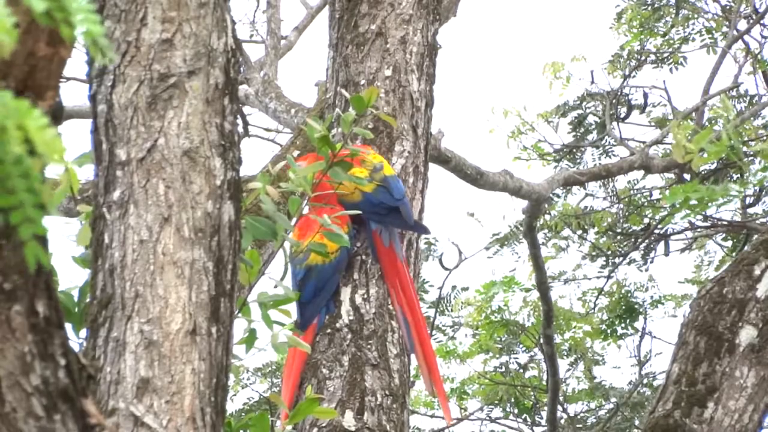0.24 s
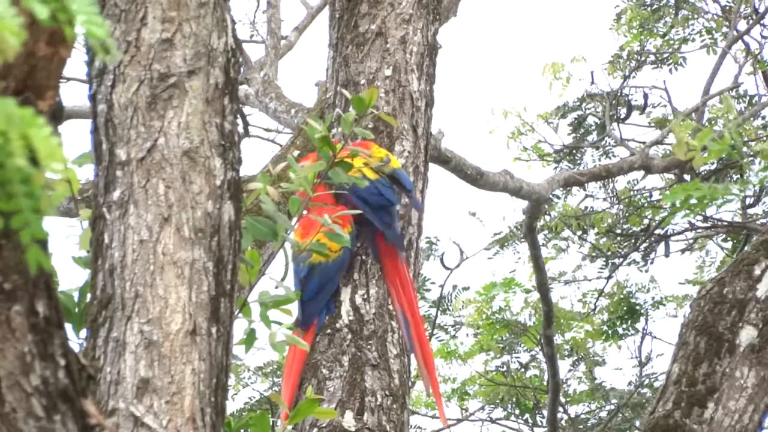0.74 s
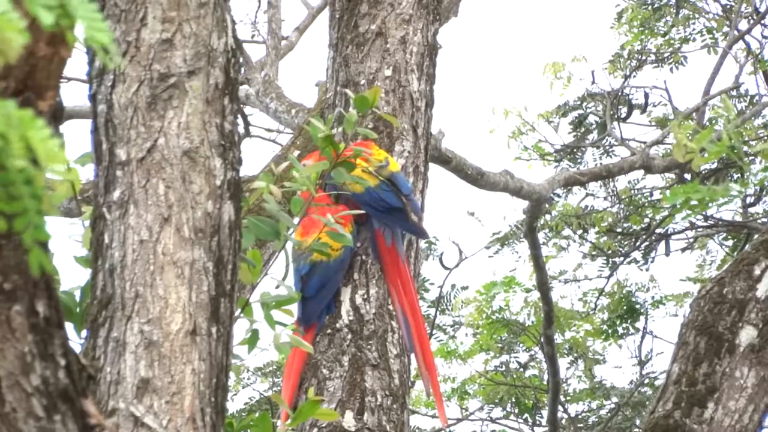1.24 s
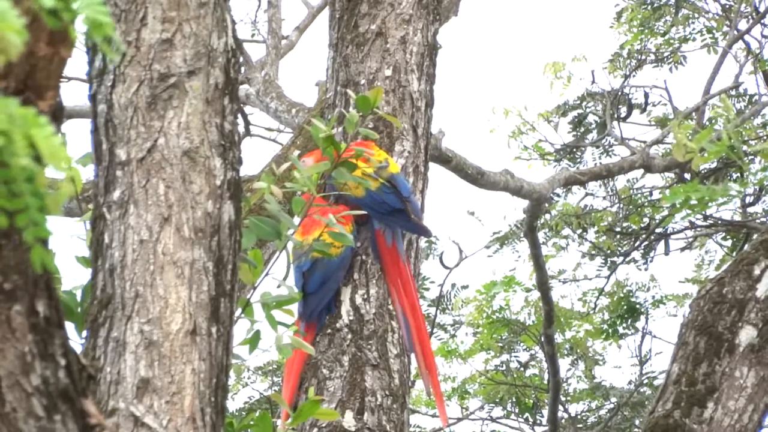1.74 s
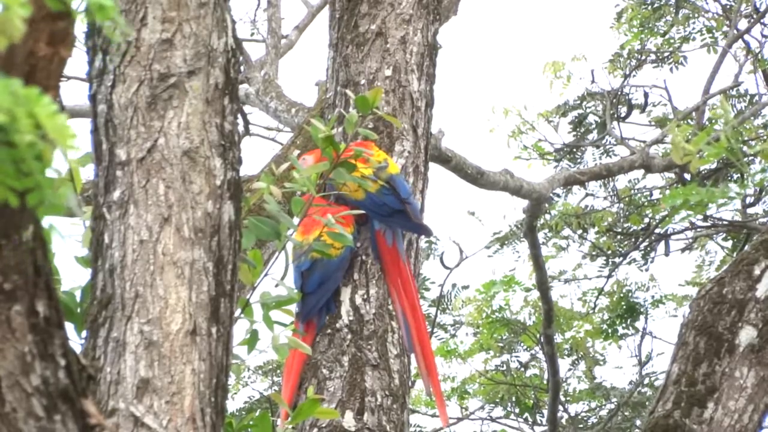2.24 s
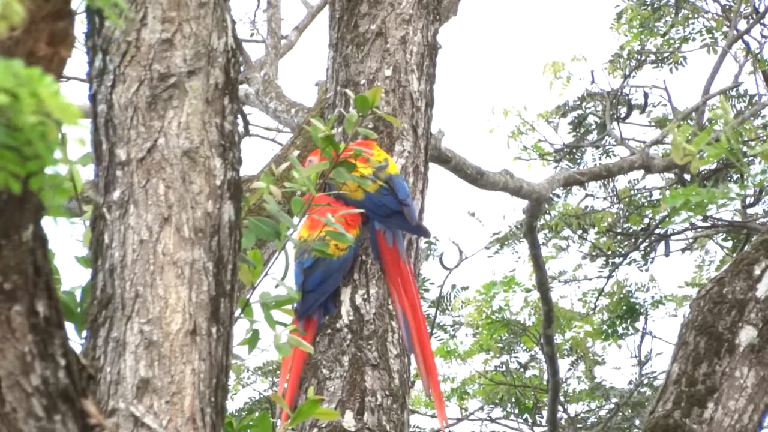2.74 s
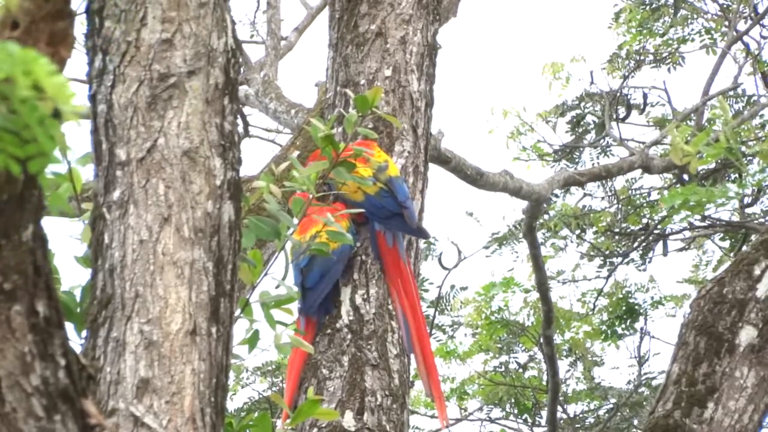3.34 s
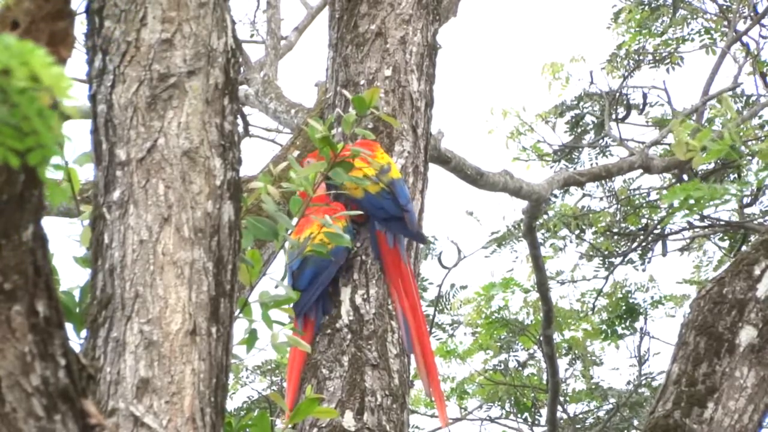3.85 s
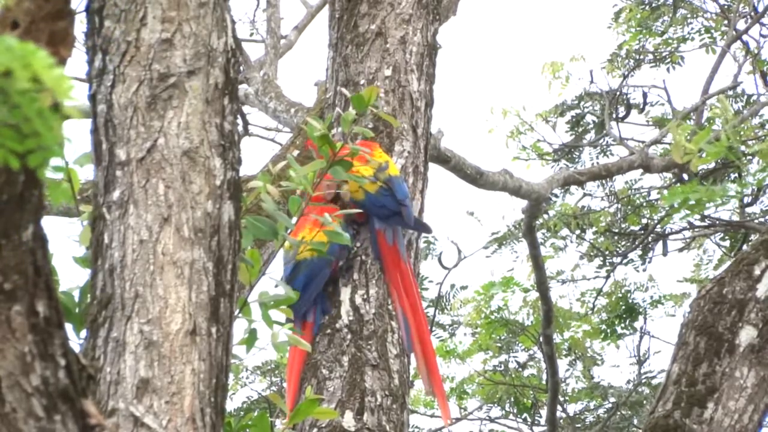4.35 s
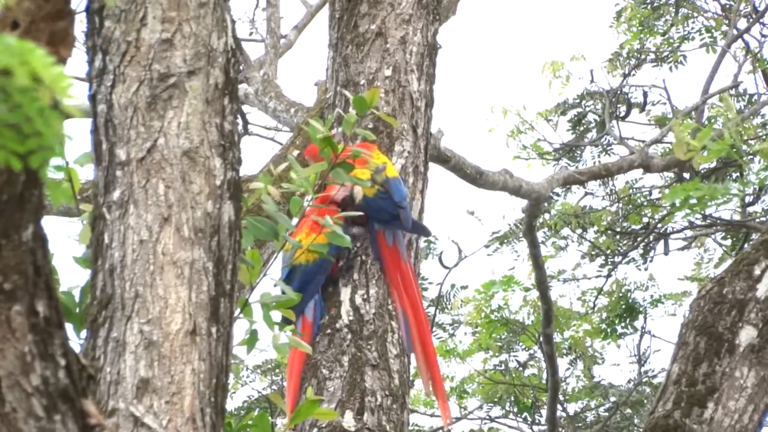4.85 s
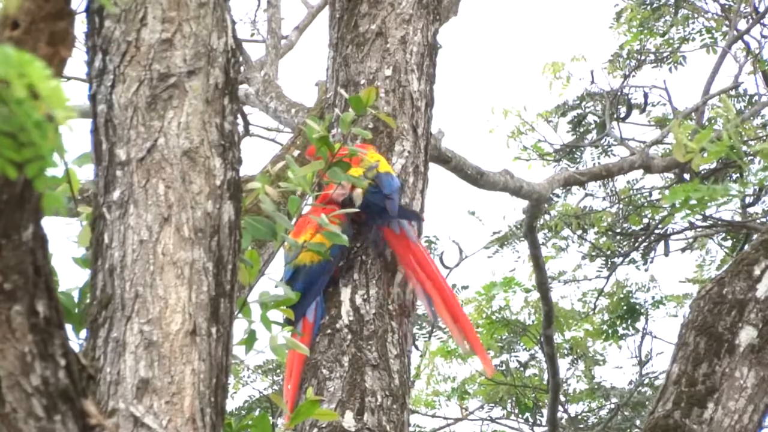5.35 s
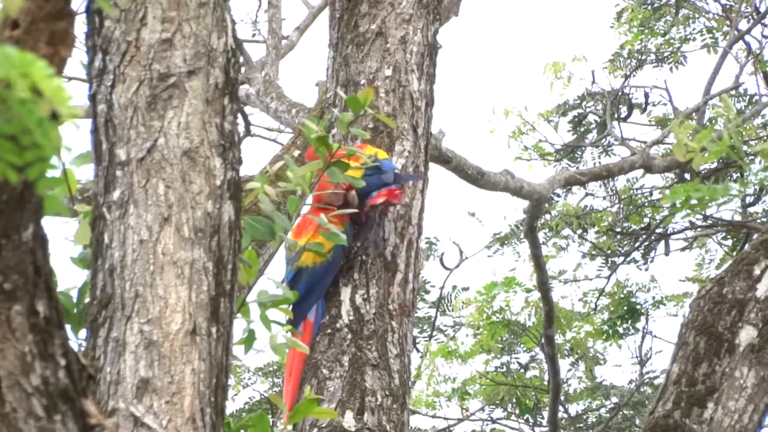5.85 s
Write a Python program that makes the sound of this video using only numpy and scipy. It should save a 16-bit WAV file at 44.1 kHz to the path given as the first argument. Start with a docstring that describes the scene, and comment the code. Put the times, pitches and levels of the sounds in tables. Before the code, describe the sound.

Two macaws quarrel in a tree. A harsh squawk and a long, wavering bray open the exchange, with a brief rustle of leaves and snapping twigs. Softer croaks follow, then stronger squawks, one very loud pitched screech and a few short calls. Small birds chirp and whistle faintly farther off, over a steady insect hiss and a thin high tone. The parrots sound straight ahead, with a slight woodland echo.

```python
"""Macaws quarrelling in a tree

Two macaws trade hoarse squawks, a long bray and one loud, pitched screech: irregular pulses from the
syrinx, filtered by the resonances of throat and beak. Small birds chirp and whistle in nearly pure
glides, and leaves rustle over a high insect hiss and the rush of the woods. Trunks and crowns
scatter the calls back to a nearly mono microphone."""
import sys
import numpy as np
from scipy import signal
from scipy.fft import rfft, irfft, next_fast_len
from scipy.io import wavfile
from scipy.ndimage import uniform_filter1d, map_coordinates

SR = 44100
rng = np.random.default_rng(int(sys.argv[2]) if len(sys.argv) > 2 else 0)


def master_out(mix):
    """Clip the mix to full scale and print it as 16-bit PCM to the path in sys.argv[1]."""
    frames = np.transpose(np.atleast_2d(mix))
    ceiling = np.clip(frames, -1, 1)
    pcm = np.round(ceiling * 32767).astype(np.int16)
    wavfile.write(sys.argv[1], SR, pcm)


N = 268569

# Course of the screech: t/s, pitch f/Hz, level/dB, roughness (0-1)
SCREECH_COURSE = [(4.53, 850, -52, .7), (4.555, 850, -44, .6), (4.592, 800, -39, .6), (4.61, 810, -29, .5),
                  (4.632, 865, -26, .4), (4.66, 878, -22, .22), (4.683, 868, -17.5, .22),
                  (4.70, 880, -23.5, .4), (4.733, 900, -18.5, .22), (4.75, 863, -15.3, .08),
                  (4.795, 855, -14.2, .07), (4.815, 815, -17.5, .16), (4.828, 775, -22.5, .36),
                  (4.85, 830, -24, .6), (4.91, 720, -37.5, .7)]
# Throat response as the beak opens, gapes and closes: f/Hz, level/dB
THROAT_OPENING = [(100, -97), (450, -47), (700, -20), (880, -4), (1100, -17), (1400, -17), (1750, -4),
                  (2250, 0), (2550, -7), (2950, -2), (3400, -12), (3900, -26), (5000, -18.5), (5900, -6),
                  (6300, -19), (6800, -9), (7500, -21), (8100, -17.5), (11000, -47), (15000, -66)]
THROAT_GAPING = [(100, -103), (450, -53), (850, -10), (1300, -10), (1700, -7), (2150, -3), (2600, -15),
                 (3400, -14), (3900, -29), (6000, -15), (7000, -18.5), (9000, -26), (11000, -44),
                 (15000, -70)]
THROAT_CLOSING = [(100, -100), (750, -13), (1200, -6), (1500, -7), (2150, 1), (3000, -16), (7000, -27),
                  (14000, -66)]
GAPE_S, CLOSE_S = (4.72, 4.755), (4.812, 4.856)  # spans in which the beak opens wide and closes


def screech():
    """Mode locking: the voice settles on two partials as it swells, then drops, dulls and breaks up."""
    t, pitch, db, rough = curves(SCREECH_COURSE)
    pitch = pitch * (1 + .015 * rough * wobble(260, len(t)))
    source = syrinx(pitch, rough, doubling=.56, jitter=.17, shimmer_db=4, rasp=.6)
    opening, gaping, closing = (steady(shaped(source, response))
                                for response in (THROAT_OPENING, THROAT_GAPING, THROAT_CLOSING))
    gape, shut = np.interp(t, GAPE_S, [0, 1]), np.interp(t, CLOSE_S, [0, 1])
    voice = (1 - shut) * ((1 - gape) * opening + gape * gaping) + shut * closing
    voice = steady(branches(voice, echo_db=-5))
    phase = 2 * np.pi * np.cumsum(pitch) / SR
    shake = lambda: amp(11 * rough * wobble(300, len(t)))
    partials = steady(shake() * np.sin(2 * phase) + amp(1.5) * shake() * np.sin(2.5 * phase))
    locked = np.clip(.9 - 1.7 * rough, 0, .85) * (1 - shut)  # grows as the roughness clears
    voice = steady(crossfade(voice, partials, locked))
    ragged = amp(2.5 * rough * wobble(170, len(t)))
    out = np.zeros(N)
    add(out, t, amp(db) * ragged * voice_crack(t, voice))
    return coloured(out, lambda hz: 1 / np.hypot(1, (450 / (hz + 1)) ** 4))  # the screech carries no bass below about 450 Hz


def voice_crack(t, voice, at_s=4.644, half_width_s=.009, top_hz=2920):
    """Register break: the voice briefly gives way to an arching squeak with a weak octave below."""
    away = np.minimum(np.abs(t - at_s) / half_width_s, 2)
    pitch = top_hz * (1 - .07 * away ** 2)
    squeak = unit(tone(pitch) + amp(-13) * tone(pitch / 2))
    return crossfade(voice, squeak, .82 * np.exp(-away ** 4))


# Squawks: start t/s, rise t/s, fall t/s, peak level/dB, pitch f/Hz, roughness (0-1),
# lower resonance f/Hz, its level/dB, upper resonance f/Hz, its level/dB
SQUAWK_CALLS = [ (-.05, .07, .09, -26, 744, .9, 1420, 4, 2130, 5),
                (.08, .025, .06, -35, 735, .6, 1500, 3, 2200, 12),
                (.63, .04, .22, -45, 800, .8, 1300, 1, 2680, 5),
                (1.04, .07, .085, -45.5, 777, .8, 1570, 13, 3280, 7),
                (1.305, .025, .09, -46, 760, .8, 1600, 2, 2600, 6),
                (1.452, .06, .13, -37.5, 760, .85, 1540, 5, 2750, 7),
                (1.91, .06, .06, -44, 762, .5, 1520, 14, 2800, 5),
                (2.0, .05, .04, -31.5, 768, .6, 1160, 20, 1540, 12),
                (2.06, .04, .105, -40, 748, 1, 1500, 4, 2750, 4),
                (2.29, .095, .13, -36.7, 797, 1, 1400, 3, 3150, 3),
                (2.945, .165, .072, -31.3, 637, .8, 1570, 8, 2850, 9),
                (3.345, .062, .115, -27.3, 590, .9, 1600, 8, 2130, 7),
                (3.49, .04, .05, -33.5, 723, .55, 1464, 11, 2200, 9),
                (3.55, .06, .052, -31.5, 735, .45, 1450, 12, 2560, 15),
                (3.96, .025, .045, -45, 700, .7, 1400, 6, 1850, 6),
                (4.97, .06, .065, -32.3, 640, .65, 1900, 9, 2230, 10),
                (5.19, .08, .055, -35, 700, .65, 1400, 7, 2000, 7),
                (5.49, .08, .04, -39.5, 736, .65, 1330, 10, 2150, 19),
                (5.684, .026, .062, -33.5, 687, .5, 1400, 2, 2024, 10),
                (6.04, .045, .05, -35, 687, .3, 1620, 17, 2150, 10)]


def squawks():
    """Frequency modulation: pitch and resonances rise as the beak opens slowly and sag as it shuts."""
    out = np.zeros(N)
    for start, rise, fall, peak_db, pitch_hz, rough, *resonances in SQUAWK_CALLS:
        t, u = curves([(start, -1), (start + rise, 0), (start + rise + fall, 1)])
        # each call swells, holds its strength, then breaks off
        db = peak_db - 12 * np.maximum(-u, 0) ** 1.8 - 14 * np.maximum(u, 0) ** 2.8
        gape = np.sin(np.pi * ((t - t[0]) / (t[-1] - t[0])) ** 1.5)
        pitch = pitch_hz * (1 + .07 * (gape - .6))
        glide = 1 + .045 * (gape - .7)
        add(out, t, amp(db - .5) * hoarse_voice(pitch, np.full(len(t), rough), glide, *resonances))
    return out


# Course of the bray: t/s, pitch f/Hz, level/dB, roughness (0-1)
BRAY_COURSE = [(.14, 800, -43, .9), (.19, 870, -33.5, .85), (.225, 915, -34, .7), (.29, 885, -28.5, .6),
               (.36, 905, -31, .48), (.42, 960, -34, .42), (.46, 925, -34.5, .5), (.505, 915, -37, .55),
               (.545, 800, -30.5, .75), (.58, 765, -28.5, .8), (.63, 715, -37, .9)]


def bray():
    """Formant tracking: resonances follow a long call that wavers, then drops and turns hoarse."""
    t, pitch, db, rough = curves(BRAY_COURSE)
    glide = np.sqrt(pitch / np.median(pitch))
    voice = hoarse_voice(pitch, rough, glide, low_hz=1850, low_db=4, high_hz=2700, high_db=6)
    out = np.zeros(N)
    add(out, t, amp(db) * voice)
    return out


# Throat response with the beak half open: f/Hz, level/dB
THROAT_HALF_OPEN = [(80, -92), (250, -51), (420, -30.5), (680, -11.5), (800, -4.5), (1080, -4), (1400, 0.5),
                    (2200, 0), (3200, -1.5), (4000, -6), (4600, -12.5), (7000, -21.5), (10000, -35),
                    (14000, -60)]


def hoarse_voice(pitch, rough, glide, low_hz, low_db, high_hz, high_db, width_hz=190):
    """Source and filter: lurching pulses excite three resonances, which slide by the factor glide."""
    glide = glide * (1 + .012 * wobble(40, len(pitch)))
    lurch = 1 + .02 * rough * wobble(70, len(pitch))
    source = syrinx(pitch * lurch / glide, rough,
                    doubling=.75 * rough.mean(), jitter=.12, shimmer_db=4.5, rasp=.55)
    gap_hz = high_hz - low_hz
    peaks = [(low_hz, low_db), (high_hz, high_db), (high_hz + 1.38 * gap_hz, -7)]
    beak = lambda hz: 1 + sum(amp(db) * resonance(hz, centre, width_hz) ** 2 for centre, db in peaks)
    antiresonance_db = lambda hz: -4 * resonance(hz, low_hz + .3 * gap_hz, .3 * gap_hz) ** 2
    voice = coloured(source, lambda hz: amp(along(THROAT_HALF_OPEN, hz) + antiresonance_db(hz)) * beak(hz))
    voice = map_coordinates(voice, [np.cumsum(glide)], mode="mirror")  # read speed scales all frequencies
    return steady(branches(voice, echo_db=-3, count=30))


def syrinx(pitch, rough, doubling, jitter, shimmer_db, rasp):
    """Period doubling: strong and weak pulses alternate; roughness unsettles them and adds turbulence."""
    size = len(pitch)
    cycles = np.cumsum(pitch * (1 + .049 * rough * wobble(120.2, size))) / SR
    at = np.interp(np.arange(1, cycles[-1]), cycles, np.arange(size))
    chaos = np.interp(at, np.arange(size), rough)
    shift, strength = rng.standard_normal((len(at), 2)).T
    at = at + jitter * chaos * shift * SR / pitch.mean()
    alternation = 1 + doubling * (-1) ** np.arange(len(at))  # adds lines halfway between the harmonics
    push = amp(shimmer_db * chaos * np.tanh(strength)) * alternation
    taps = np.floor(at)[:, None] + np.arange(-7, 9)
    lag = taps - at[:, None]
    shapes = np.sinc(lag) * np.cos(np.pi * lag / 16) ** 2  # band-limited impulses
    slots = np.clip(taps, 0, size - 1).astype(int)
    pulses = np.bincount(slots.ravel(), (shapes * push[:, None]).ravel(), size)
    puffs = rng.standard_normal(size) * (1 + np.cos(np.pi * cycles)) ** 2
    return unit(pulses) + rasp * rough * unit(puffs)


def near_whistle(start_s=3.865, length_s=.172, from_hz=2650, held_hz=3290, scoop_s=.019):
    """Exponential glide: a nearer bird scoops up to a firm, held note."""
    t, u = curves([(start_s, -.6), (start_s + length_s, 1)])
    pitch = held_hz + (from_hz - held_hz) * np.exp((start_s - t) / scoop_s)
    out = np.zeros(N)
    add(out, t, amp(-36.5 - 9 * u ** 2) * tone(pitch))
    return out


# Small birds' notes: start t/s, length t/s, start f/Hz, end f/Hz, relative level/dB
FALLING_CHIRPS = [(.597, .036, 6950, 5900, -44), (.612, .15, 8900, 5550, -45),
                  (.965, .054, 7600, 5800, -43), (1.254, .09, 7360, 6150, -50),
                  (1.505, .08, 7350, 5750, -49), (1.66, .06, 6550, 6150, -48),
                  (1.745, .16, 9000, 6200, -48.5), (2.02, .11, 8700, 6400, -46.5),
                  (2.255, .04, 6750, 6250, -48), (2.32, .125, 8900, 6450, -48.5),
                  (2.712, .045, 6650, 6150, -48), (2.967, .054, 6350, 6070, -46),
                  (3.092, .04, 6400, 5950, -44), (3.155, .075, 7900, 5700, -49)]
STRAIGHT_WHISTLES = [(.25, .08, 8600, 8480, -45), (.755, .065, 4700, 5400, -47),
                     (.965, .07, 3900, 2800, -49), (3.70, .05, 4920, 5380, -43.5),
                     (3.68, .18, 3220, 4040, -49), (3.853, .025, 4100, 5800, -48),
                     (5.315, .032, 3310, 3620, -43), (5.577, .025, 3220, 3430, -45)]


def small_birds():
    """Frequency sweeps under a trembling swell: chirps flatten as they fall, whistles slide linearly."""
    out = np.zeros(N)
    for notes, bend in ((FALLING_CHIRPS, 1.22), (STRAIGHT_WHISTLES, 1)):
        for start, length, from_hz, to_hz, db in notes:
            t, u = curves([(start, 0), (start + length, 1)])
            pitch = to_hz + (from_hz - to_hz) * (1 - u) ** bend
            swell = np.abs(np.sin(np.pi * u ** 1.15)) ** .6
            tremble = amp(2.5 * wobble(110, len(u)))
            add(out, t, amp(db) * swell * tremble * tone(pitch))
    return coloured(out, lambda hz: 1 / np.hypot(1, (hz / 10000) ** 8))  # the notes carry little above 10 kHz


def tone(pitch, overtone_db=-23):
    """Nearly sinusoidal oscillation: a slightly unsteady whistle with a weak second harmonic."""
    phase = 2 * np.pi * np.cumsum(pitch * (1 + .004 * wobble(144, len(pitch)))) / SR
    return np.sin(phase) + amp(overtone_db) * np.sin(2 * phase)


# Brushed leaves and snapping twigs: t/s, relative level/dB
LEAF_BRUSHING = [(0, -41), (.15, -41.5), (.45, -62), (.7, -106)]
TWIG_SNAPS = [(.162, -33), (.272, -36), (3.815, -44)]
# Spectrum of dry foliage: f/Hz, level/dB
LEAF_SPECTRUM = [(1000, -50), (3500, 7), (6000, 3.5), (9500, -0.5), (12000, -10), (15000, -21)]


def foliage(snap_decay_s=.0017):
    """Friction and fracture: a shifting bird makes a lumpy rustle and a few crisp bursts of noise."""
    t = np.arange(N) / SR
    force = amp(np.interp(t, *np.transpose(LEAF_BRUSHING)) + 2.2 * wobble(146, N))
    for s, db in TWIG_SNAPS:
        force += amp(db + 3) * (t >= s) * np.exp(-np.abs(t - s) / snap_decay_s)
    return shaped(force * rng.standard_normal(N), LEAF_SPECTRUM)


def branches(x, echo_db, count=14):
    """Early reflections: nearby limbs add weak copies within about 20 ms."""
    spread, sign = rng.random((2, count))
    delay_s = .000971 + .02 * spread ** 2
    echoes = np.bincount((delay_s * SR).astype(int), np.sign(sign - .5) * amp(echo_db) / np.sqrt(count))
    return x + signal.fftconvolve(x, echoes)[:len(x)]


# Reverberation time of the crowns: f/Hz, t/s to fall by 60 dB
CROWN_DECAY = [(200, .45), (1500, .6), (4000, .45), (10000, .3)]


def trees(x, side_db):
    """Diffuse scattering: trunks and crowns return a stereo tail whose treble dies first."""
    hz, t, noise = signal.stft(rng.standard_normal((2, SR)), SR, nperseg=256)
    decay = amp(-60 * t / along(CROWN_DECAY, hz)[:, None])
    tail = signal.istft(noise * decay, SR, nperseg=256)[1]
    tail /= np.linalg.norm(tail[0])
    delayed = np.pad(x, (400, 0))[None]
    mid, side = signal.fftconvolve(delayed, tail, axes=1)[:, :N] * amp([[0], [side_db]])
    return np.array([mid + side, mid - side])


# Spectrum of the woods: f/Hz, relative level/dB
WOODS_SPECTRUM = [(25, -60), (86, -35), (237, -33), (501, -19.5), (637, -9), (1240, -6.5), (1860, -9),
                  (2180, -5), (2430, -10), (3540, -10), (4040, -12.5), (5600, -11.5), (6700, -7),
                  (9270, -4.5), (15000, -53)]
# Course of the background: t/s, relative rush level/dB, relative hiss level/dB
WOODS_COURSE = [(0, -52.5, -47), (.7, -53.5, -49), (1.4, -55, -51), (5.3, -54.5, -51.8), (6.09, -60, -56.5)]
# Narrow tones of the woods: centre f/Hz, width f/Hz, level/dB
WOODS_TONES = [(2176, 110, -53), (1255, 116, -59), (119.6, 8.5, -93)]


def woods(crossover_hz=5000):
    """Band-filtered noise: a soft rush of air, high insect hiss and wavering narrow tones."""
    s, rush_db, hiss_db = np.transpose(WOODS_COURSE)
    level = lambda db: amp(np.interp(np.arange(N) / SR, s, db) + .75 * wobble(8.4, N))
    treble = lambda hz: 1 / (1 + (crossover_hz / (hz + 1)) ** 6)
    rush = air(lambda hz: amp(along(WOODS_SPECTRUM, hz)) * np.sqrt(1 - treble(hz)))
    hiss = air(lambda hz: amp(along(WOODS_SPECTRUM, hz)) * np.sqrt(treble(hz)))
    out = amp(6.5) * level(rush_db) * rush + amp(-.5) * level(hiss_db) * hiss
    for centre_hz, width_hz, db in WOODS_TONES:
        out += amp(db + 1.5 * wobble(9, N)) * air(lambda hz: resonance(hz, centre_hz, width_hz) ** 2)
    return out


# Breadth of the ambience: f/Hz, side minus mid level/dB
AMBIENCE_WIDTH = [(150, -14), (4000, -14.5), (8000, -25.5), (10000, -4.5)]


def air(gain):
    """Partial coherence: stereo noise of rms 1, mostly alike on both sides."""
    mid, side = coloured(rng.standard_normal((2, N)), gain)
    side = shaped(side, AMBIENCE_WIDTH)
    return unit(np.array([mid + side, mid - side]))


def amp(db):
    """Decibels to amplitude ratio."""
    return 10 ** (np.asarray(db) / 20)


def unit(x):
    """Normalisation to rms 1."""
    return x / np.sqrt(np.mean(x ** 2) + 1e-20)


def steady(x):
    """Division by the running rms evens out slow level changes and keeps the grain."""
    return x / np.sqrt(np.abs(uniform_filter1d(x ** 2, size=1100)) + 1e-12)


def crossfade(a, b, share):
    """Equal-power mixing: b takes the given share of the power."""
    return np.sqrt(1 - share) * a + np.sqrt(share) * b


def along(points, hz):
    """Interpolation of (f/Hz, value) points on a logarithmic frequency axis."""
    f, v = np.transpose(points)
    return np.interp(np.log(hz + 1), np.log(f + 1), v)


def curves(rows):
    """Linear interpolation: sample times from first row to last, and each column at those times."""
    s, *cols = np.transpose(rows)
    t = np.arange(int(s[0] * SR), int(s[-1] * SR)) / SR
    return [t] + [np.interp(t, s, c) for c in cols]


def wobble(rate, size):
    """Random modulation: a smooth curve with rate knots a second."""
    return map_coordinates(rng.standard_normal(int(size * rate / SR) + 4), [np.arange(size) * rate / SR])


def coloured(x, gain):
    """Minimum-phase filter of magnitude gain(f/Hz), made causal by folding the cepstrum."""
    m = 2 * next_fast_len(x.shape[-1] // 2 + 2048)
    cepstrum = irfft(np.log(np.maximum(gain(np.fft.rfftfreq(m, 1 / SR)), 1e-6)))
    cepstrum[1:m // 2] *= 2
    cepstrum[m // 2 + 1:] = 0
    return irfft(rfft(x, m) * np.exp(rfft(cepstrum)), m)[..., :x.shape[-1]]


def shaped(x, response):
    """Filtering by a table of (f/Hz, level/dB)."""
    return coloured(x, lambda hz: amp(along(response, hz)))


def resonance(hz, centre, width):
    """Magnitude response of a damped resonator, 1 at its centre."""
    return 1 / np.hypot(1, (hz ** 2 - centre ** 2) / (hz * width + 1e-9))


def add(track, t, sound):
    """Superposition: mix in a sound at its times, with 2 ms fades."""
    at = np.round(t * SR).astype(int)
    inside = (at >= 0) & (at < N)
    edge = np.clip(np.minimum(t - t[0], t[-1] - t) / .002, 0, 1)
    track[at[inside]] += (sound * edge)[inside]


def scene():
    """Direct and reverberant fields: macaws ahead, the screecher a little left, small birds far off."""
    hoarse, loud, near = squawks() + bray(), screech(), near_whistle()
    far = amp(-1.5) * branches(small_birds(), echo_db=-3, count=30)
    direct = (hoarse + far + near + foliage()) * amp([[-.35], [.35]]) + loud * amp([[.5], [-.5]])
    scattered = amp(-8.5) * hoarse + amp(-16) * loud + amp(-6.5) * far + amp(-13) * near
    return direct + trees(scattered, side_db=-14) + woods() * amp([[-.15], [.15]])


def record(dry, top_hz=15400):
    """Band limiting: the microphone passes nothing above top_hz."""
    m = next_fast_len(N + SR // 2)
    return irfft(rfft(dry, m) * (np.fft.rfftfreq(m, 1 / SR) < top_hz), m)[..., :N]


dry = scene()
out = record(dry)
master_out(out)
```